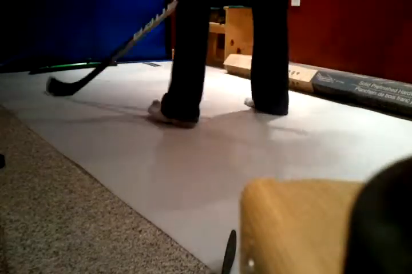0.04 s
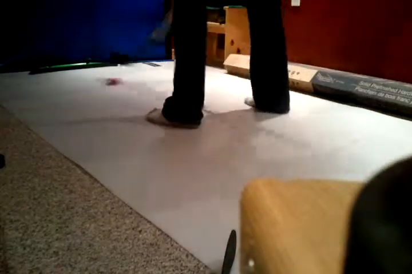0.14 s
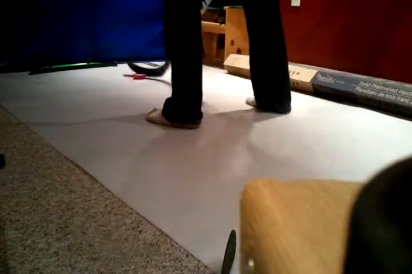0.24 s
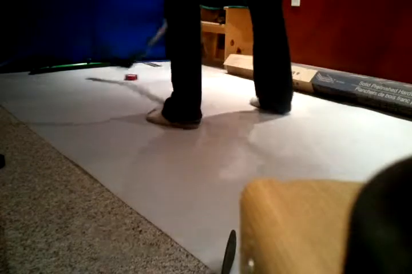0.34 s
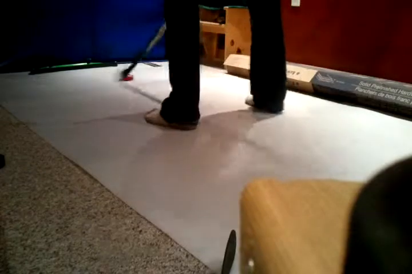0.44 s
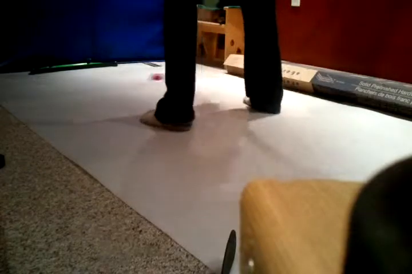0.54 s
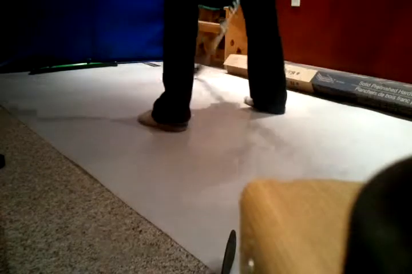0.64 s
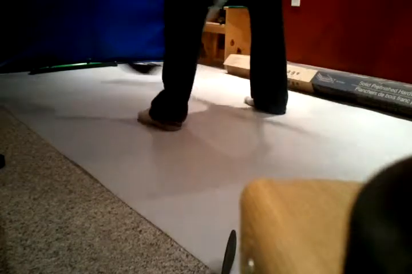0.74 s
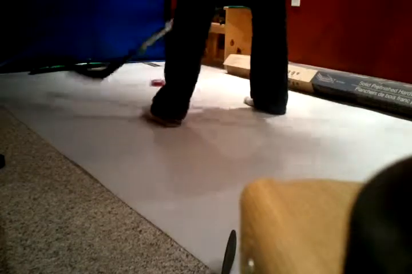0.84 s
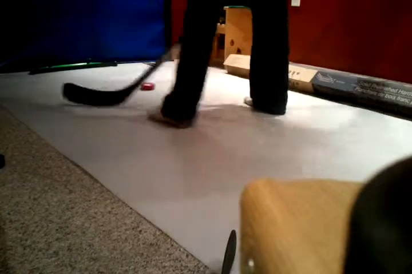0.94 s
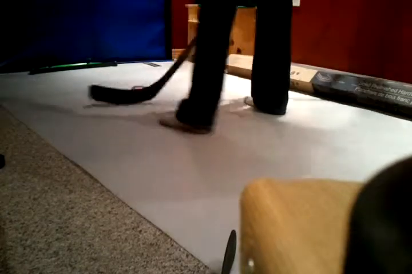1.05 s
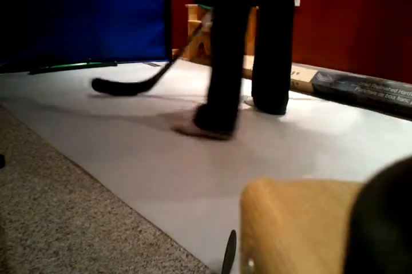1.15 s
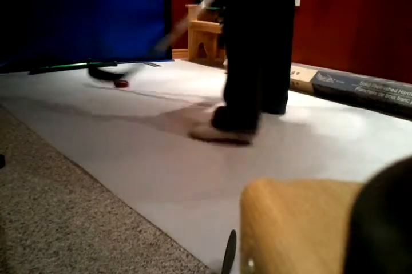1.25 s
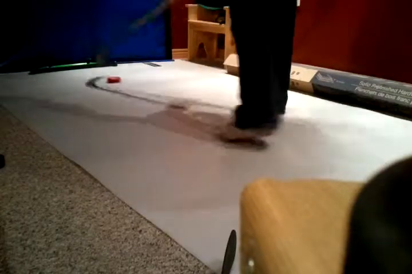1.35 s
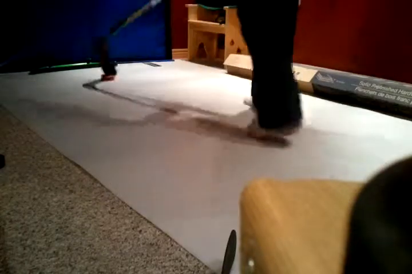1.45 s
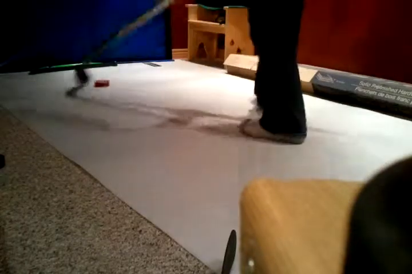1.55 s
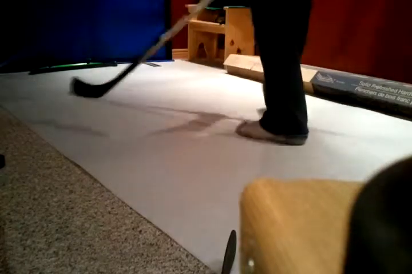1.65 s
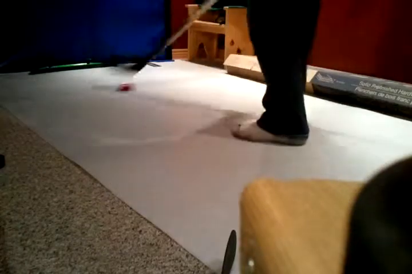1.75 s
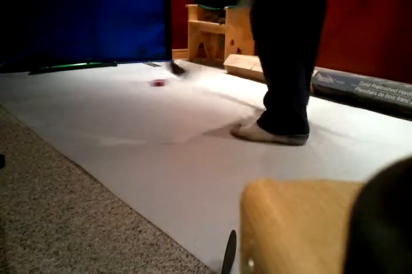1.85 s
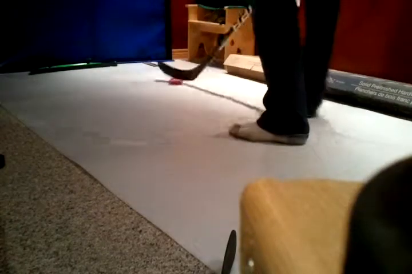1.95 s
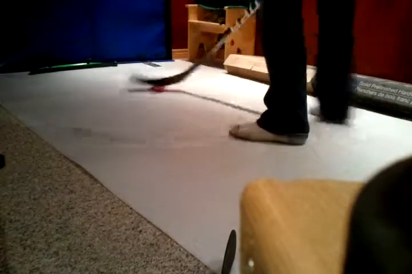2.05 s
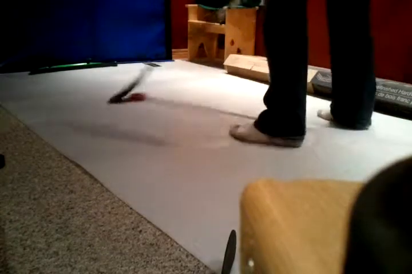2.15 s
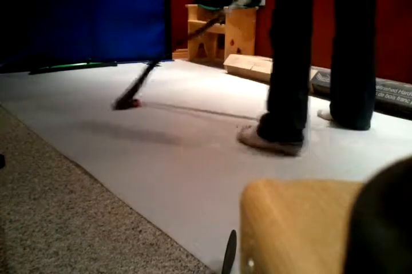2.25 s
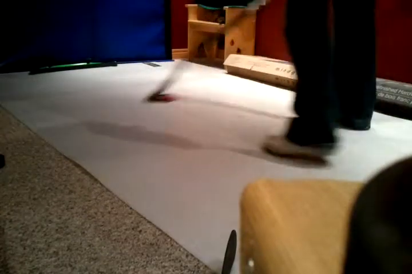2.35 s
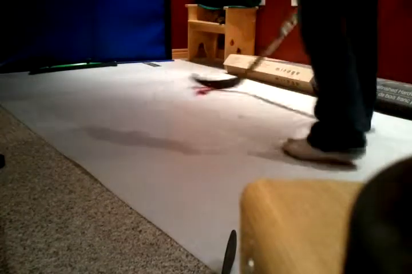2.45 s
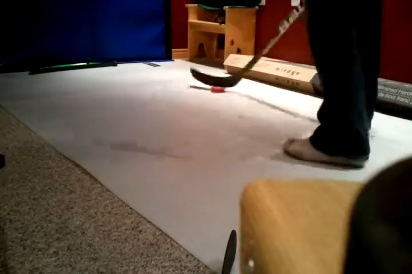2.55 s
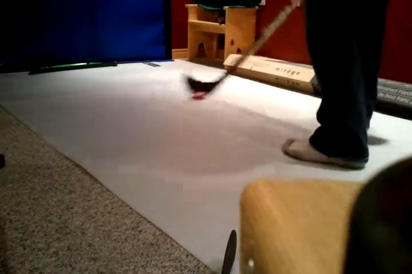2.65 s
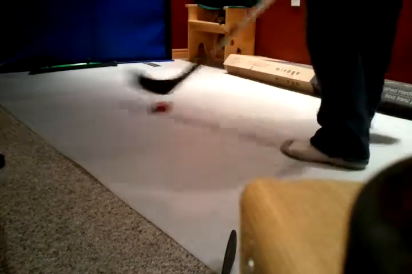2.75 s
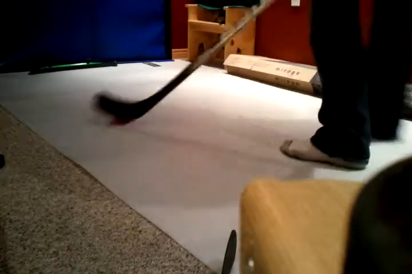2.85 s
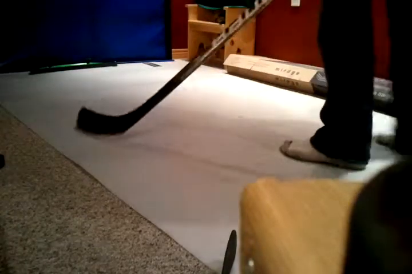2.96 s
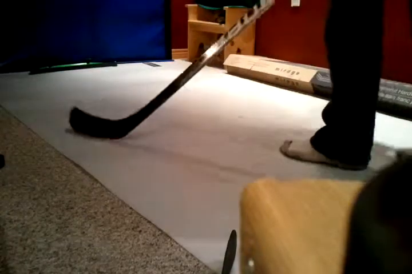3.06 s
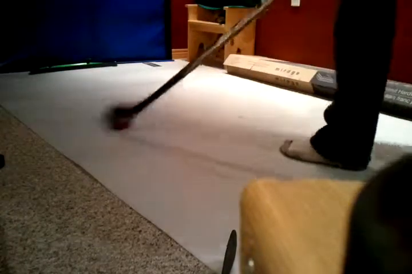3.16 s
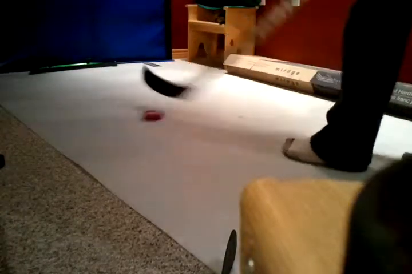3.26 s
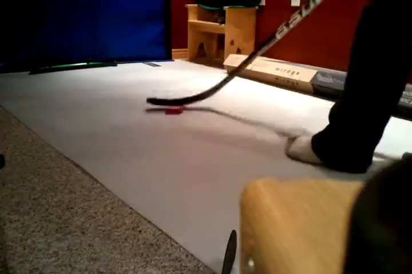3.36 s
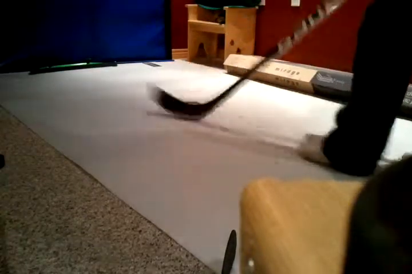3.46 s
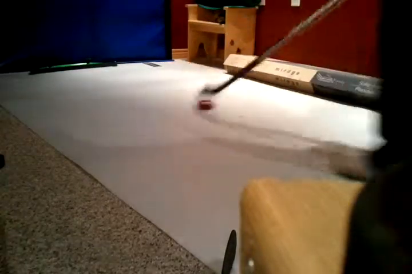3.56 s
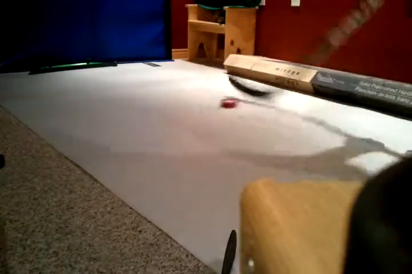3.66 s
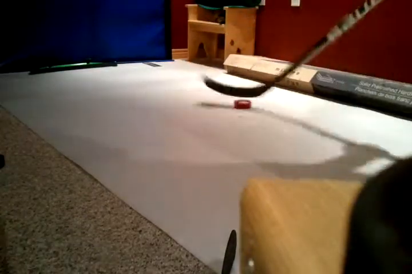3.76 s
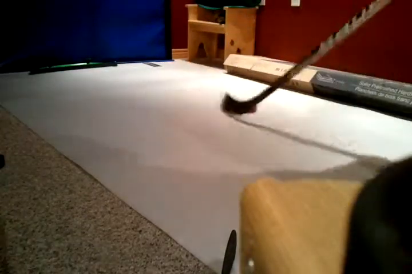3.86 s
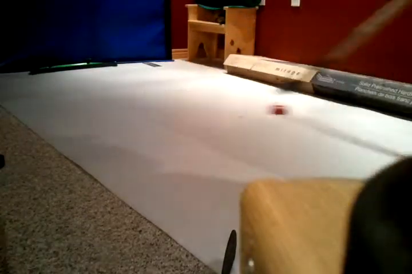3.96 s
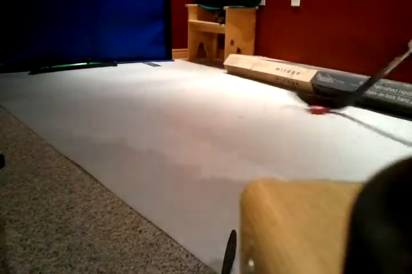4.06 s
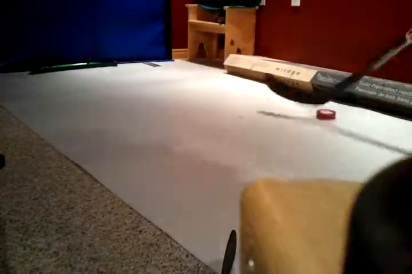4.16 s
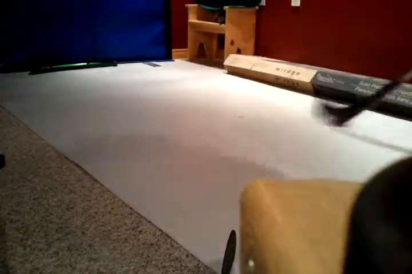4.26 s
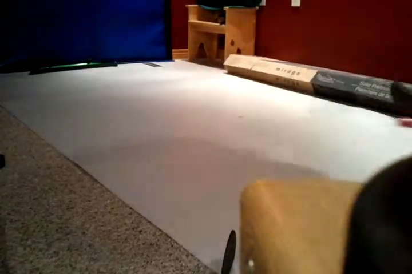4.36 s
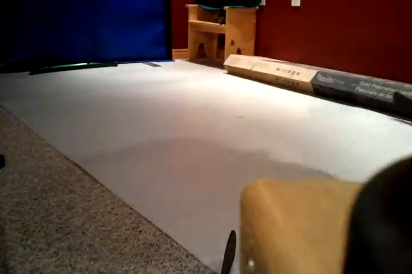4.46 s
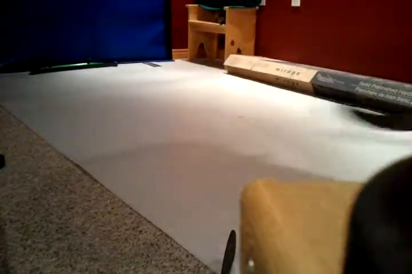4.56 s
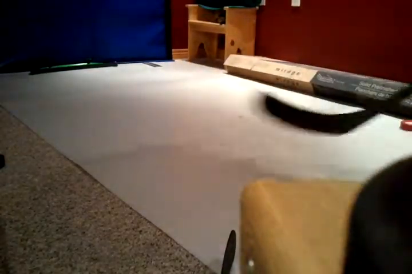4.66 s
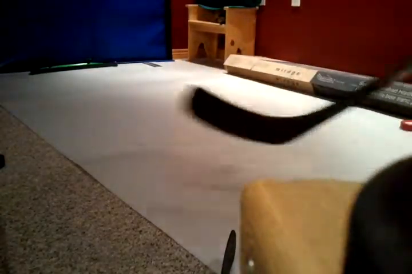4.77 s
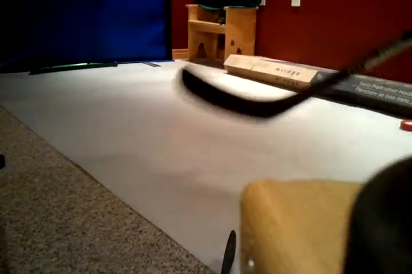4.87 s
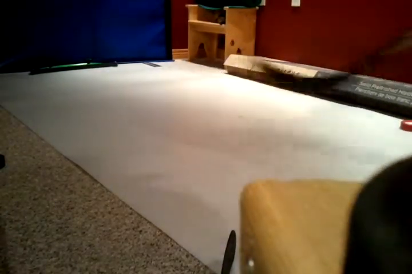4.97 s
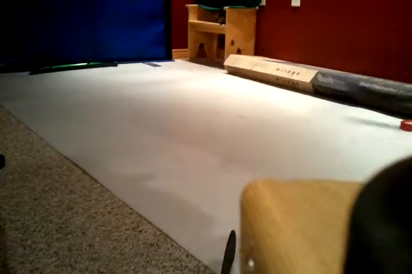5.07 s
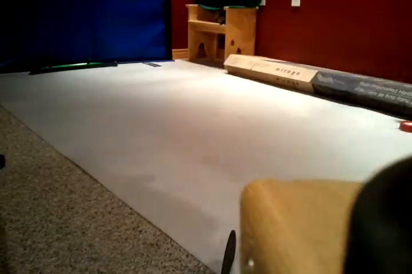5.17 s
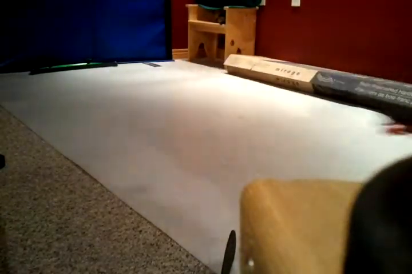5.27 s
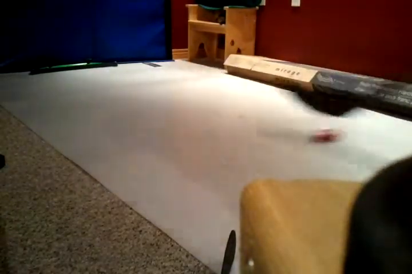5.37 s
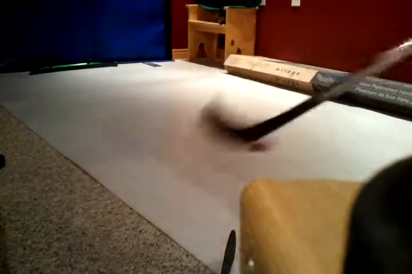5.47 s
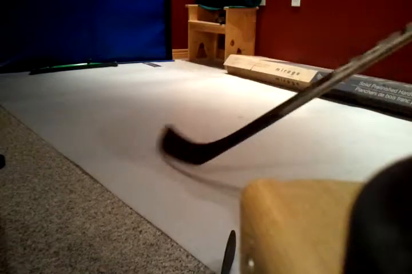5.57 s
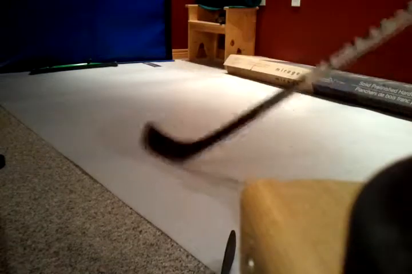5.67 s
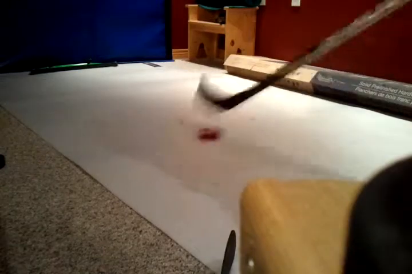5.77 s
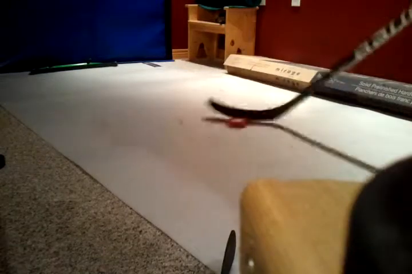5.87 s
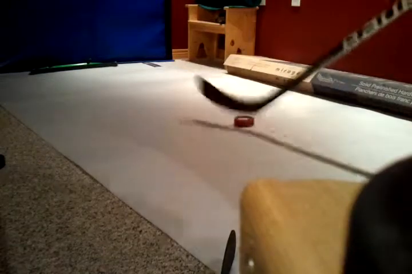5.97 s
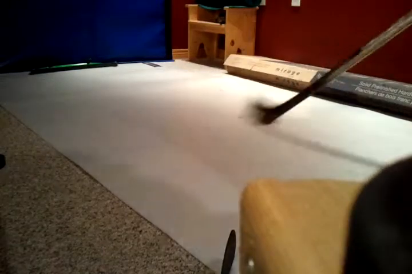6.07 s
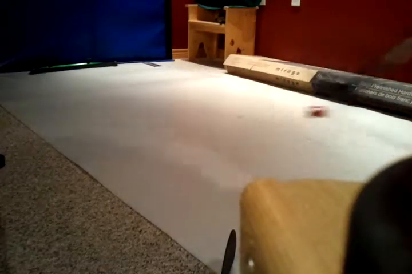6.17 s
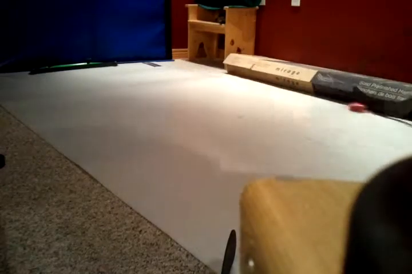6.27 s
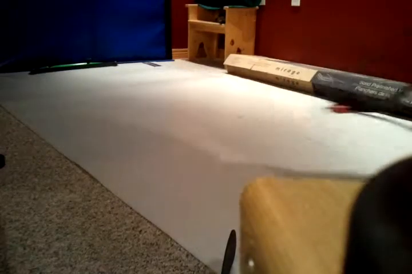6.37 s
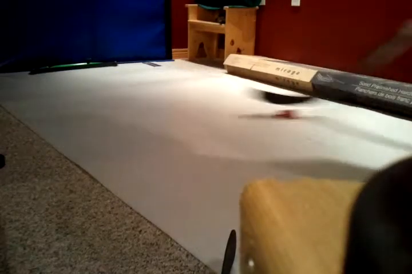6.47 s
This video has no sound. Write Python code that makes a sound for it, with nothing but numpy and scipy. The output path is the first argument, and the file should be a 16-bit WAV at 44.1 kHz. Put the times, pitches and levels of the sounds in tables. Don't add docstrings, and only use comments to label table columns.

```python
import sys
import numpy as np
from scipy import signal
from scipy.fft import rfft, irfft, next_fast_len
from scipy.io import wavfile

SR = 44100
rng = np.random.default_rng(int(sys.argv[2]) if len(sys.argv) > 2 else 0)


def elevation(decibels):
    levels = np.asarray(decibels, float)
    return 10 ** (levels / 20)


def pcm_store(signal):
    levels = np.round(np.clip(np.atleast_2d(signal), -1, 1) * 32767)
    wavfile.write(sys.argv[1], SR, levels.astype(np.int16).T)


N = 287973
HIT_SIZE = 2 ** 14

# frequency in Hz, level in dB, t60 in s.
BLADE_MODES = [(567, -16.5, 0.05), (902, -8.5, 0.018), (1060, -1, 0.013), (1280, -1.5, 0.026),
               (1500, -1.5, 0.014), (1710, -3, 0.024), (1970, -2.5, 0.012), (2156, -3, 0.005),
               (2450, -9, 0.0087)]


def rms_one(x):
    return x / np.sqrt(np.mean(x ** 2) + 1e-20)


def colour(points, size):
    hz, db = np.transpose(points)
    bins = np.arange(size // 2 + 1) * SR / size + 1
    return elevation(np.interp(np.log(bins), np.log(hz), db, left=-70, right=-70))


def causal(gain):
    both_sides = np.r_[gain, gain[-2:0:-1]]
    spectrum = np.exp(np.conj(signal.hilbert(np.log(both_sides))))
    return spectrum[:len(gain)]


def drift(rate):
    knots = rng.standard_normal(400)
    return np.interp(np.arange(N) / SR * rate, np.arange(400), knots)


def steady(points, level_db, patchy_db, rate):
    size = 2 * next_fast_len(N // 2 + 1)
    white = rfft(rng.standard_normal(size))
    noise = irfft(white * colour(points, size))[:N]
    return elevation(level_db + patchy_db * drift(rate)) * rms_one(noise)


def struck(modes, spread_db):
    t = np.arange(HIT_SIZE) / SR
    luck = rng.standard_normal((len(modes), 2))
    total = 0
    for (hz, db, t60), (stronger, sharper) in zip(modes, luck):
        decay = elevation(db + spread_db * stronger - 60 * t / t60)
        total = total + decay * np.sin(2 * np.pi * hz * (1 + 0.027 * sharper) * t)
    return total


def blows(rows, body_modes, bounce_s, lift_db, wet_db, early, overload):
    # frequency in Hz, level in dB, t60 in s.
    pad_modes = [(194, -1.5, 0.028), (211.3, -7, 0.17), (260.4, -1, 0.053), (324.4, 0.5, 0.038),
                 (423.6, 1, 0.021)]
    # frequency in Hz, level in dB.
    click_spectrum = [(700, -71), (2000, -11.5), (3000, -12), (3600, -10), (4300, -7.5), (4800, -6.5),
                      (5250, -4), (5650, -8), (6100, -13.5), (6900, -18.5), (7900, -11), (8700, -16),
                      (11000, -82.5)]
    # t60 in s, tail level in dB.
    room_decay = [
        (0.33, -24),
        (0.22, -17),
        (0.24, -20.5),
    ]
    out, t = np.zeros(N + HIT_SIZE), np.arange(HIT_SIZE) / SR
    click = irfft(causal(colour(click_spectrum, HIT_SIZE)))
    click = click / np.abs(click).max()
    for s, click_db, thud_db, knock_db, ring_hz, ring_db in rows:
        noise = rng.standard_normal((4, HIT_SIZE))
        direct = 0.14 * noise[3] * np.exp(-t / bounce_s)
        direct[0] = 1
        lumps_db = np.interp(t / 0.0042, np.arange(200), rng.standard_normal(200))
        clumps = elevation(1.85 * np.exp(-t / 0.059) * lumps_db)
        build = (1 - np.exp(-t / 0.003)) * (1 + early * np.exp(-t / 0.011))
        thud = struck(pad_modes, spread_db=3.0)
        thud = thud * (1 - np.exp(-t / 0.00076))
        knock = struck(body_modes + [(ring_hz, ring_db, 0.016)], spread_db=3.5)
        parts = zip((thud, knock, click), (thud_db, knock_db, click_db), lift_db, room_decay, noise)
        hit = 0
        for body, db, lift, (t60, tail_db), fresh in parts:
            tail = elevation(tail_db + wet_db - 60 * t / t60) * fresh * clumps * build
            true_db = db + lift + overload * max(db + 12, 0)
            hit = hit + elevation(true_db) * rfft(body) * rfft(direct + tail)
        patch_hz = np.geomspace(5, SR, num=48)
        patches = [(hz, 2.5 * luck) for hz, luck in zip(patch_hz, noise[3, -48:])]
        at = max(round(s * SR), 0)
        out[at:at + HIT_SIZE] += irfft(hit * causal(colour(patches, HIT_SIZE) + 1e-3))
    bass_cut = signal.butter(4, 183.5, "high", fs=SR, output="sos")
    return signal.sosfilt(bass_cut, out[:N])


def glide_level():
    # time in s, hiss level in dB.
    slide = [(0.0, -42), (0.84, -42), (1.02, -47.5), (2.03, -41.5), (3.58, -46.5), (3.76, -43), (4.15, -45),
             (4.64, -49), (4.82, -49), (5.44, -55), (5.55, -41), (6.53, -45.5)]
    # centre in s, level in dB, half length in s.
    skids = [
        (0.0, -23, 0.056),
        (0.296, -39, .05),
        (0.53, -35, .05),
        (.77, -36, .04),
        (1.478, -34.5, 0.05),
        (2.202, -26.5, 0.043),
        (3.835, -41, .04),
        (4.035, -45, 0.035),
        (4.332, -30, 0.059),
    ]
    # centre in s, level in dB, half length in s.
    scuffs = [
        (2.59, -56, 0.021),
        (3.162, -33.5, 0.0068),
        (3.66, -52.5, 0.023),
        (5.15, -47, 0.024),
        (5.677, -36.5, 0.023),
        (6.478, -41, 0.0053),
    ]
    t = np.arange(N) / SR
    swells = sum(elevation(db) * np.exp(-((t - at) / half) ** 2) for at, db, half in skids + scuffs)
    return 20 * np.log10(elevation(np.interp(t, *np.transpose(slide))) + swells)


def room_rumble(hiss_db):
    # frequency in Hz, level in dB per Hz.
    rumble_spectrum = [(15, -66), (25, -26), (75, -10), (128, -0.5), (477, -11), (648, -10.5), (681, -13.5),
                       (1200, -19.5), (1560, -37), (2640, -120)]
    level_db = -45.5 + 0.21 * (hiss_db - np.median(hiss_db))
    return steady(rumble_spectrum, level_db, patchy_db=1.0, rate=18)


def slide_hiss(hiss_db):
    # frequency in Hz, level in dB per Hz.
    hiss_spectrum = [(600, -11), (900, -8.5), (1700, -8), (2400, -10.5), (3200, -12.5), (4200, -7.5),
                     (4800, -4), (5400, -3.5), (5900, -9), (7000, -15.5), (8100, -10), (8800, -19),
                     (11000, -65)]
    return steady(hiss_spectrum, hiss_db, patchy_db=0.5, rate=9)


def carton_bump():
    # start in s, click in dB, thud in dB, carton in dB, carton ring in Hz.
    bumps = [
        (6.492, -0.5, -26, -12.5, 677),
        (6.505, -30, -33, -11.5, 880),
    ]
    # frequency in Hz, level in dB, t60 in s.
    carton_modes = [(423, -5, 0.033), (502, 0, 0.054), (672, 3, 0.058), (862, -0.5, 0.042),
                    (1020, 1, 0.036), (1150, 2, .03), (1390, 0.5, 0.036)]
    rows = [(*row, 7.5) for row in bumps]
    return blows(rows, carton_modes, bounce_s=0.0024, lift_db=[-11, -8, -2], wet_db=-2.0,
                 early=0.34, overload=0.26)


def light_taps():
    # start in s, click in dB, thud in dB, blade in dB, blade ring in Hz.
    taps = [(1.1873, -7, -12.5, -29, 795), (2.3704, -23, -22.5, -34.5, 759),
            (2.4577, -23, -39, -26.5, 1410), (2.4635, -15, -22, -24.5, 1780),
            (2.8756, -18, -47, -37.5, 1730), (3.1714, -16, -16.5, -34, 1030),
            (3.1814, -11.5, -27, -26.5, 626), (3.2294, -34, -40, -28, 900), (3.2812, -28, -21, -34, 1280),
            (3.6272, -20, -22, -23.5, 520), (3.9407, -8, -32, -36, 1390), (4.8085, -44, -31, -45, 1690),
            (6.2317, -11, -15, -34.5, 1500)]
    rows = [(*row, 7.5) for row in taps]
    return blows(rows, BLADE_MODES, bounce_s=0.0036, lift_db=[-12, -4, -2], wet_db=-7,
                 early=1.0, overload=0)


def pad_slaps():
    # start in s, strength in dB, thud in dB, blade ring in Hz, ring level in dB.
    slaps = [(0.2058, 0, -3, 1430, -11), (0.4642, -4, -8.5, 1620, -13), (0.6474, 0.5, -7.5, 1850, -8),
             (0.854, -2.5, -6.5, 970, -1), (1.6377, -1.5, -9, 1770, -22), (2.1146, -3.5, -10.5, 826, 1.5),
             (2.6897, -7.5, -16.5, 1180, -13), (3.0861, -4.5, -23, 1710, 9.5), (3.5405, -2.5, -9, 480, 5),
             (3.708, -4, -10.5, 1470, -18), (3.9176, -3, -15, 920, 5), (4.0912, -5.5, -6, 1370, -16),
             (4.2761, -5, -7, 923, 0), (4.4638, -0.5, -11.5, 272, -0.5), (4.6388, -2, -15.5, 1470, 17.5),
             (5.411, -3, -15, 950, 1), (5.4171, -14, -24, 343, 9), (6.126, -1.5, -12, 1490, -29)]
    rows = [(s, db, thud, db - 11.5, hz, ring) for s, db, thud, hz, ring in slaps]
    return blows(rows, BLADE_MODES, bounce_s=0.0041, lift_db=[-7, -8, 0.5], wet_db=-4.5,
                 early=0.51, overload=0.17)


def puck_cracks():
    # start in s, strength in dB, thud in dB, blade ring in Hz, ring level in dB.
    cracks = [(0.0004, -6, -11, 1060, -18), (0.245, 0.5, -19, 1500, 1.5), (0.4821, -0.5, -33, 1640, -4),
              (0.6976, 0, -23, 1710, 5.5), (0.8982, -0.5, -18, 1490, -16), (1.3845, 1.5, -57, 1610, 7.5),
              (1.6817, -1, -13, 1940, 4), (1.925, 2, -31, 1420, -4.5), (2.1782, -1.5, -26, 1640, 2),
              (2.7578, -3.5, -11.5, 1760, 1.5), (3.779, -3, -30, 1710, 13), (3.9702, -3, -7.5, 1580, -3.5),
              (4.1459, -0.5, -23, 1800, -4), (4.3101, -2.5, -19, 970, 3), (4.4942, -3, -28, 1280, 5),
              (4.666, 0.5, -35, 460, 3), (5.509, -4.5, -7.5, 1900, 7.5), (5.8666, -2, -8, 1200, 5),
              (6.1602, -2.5, -6.5, 1350, -14), (6.2875, -3, -4.5, 1655, 5), (6.3241, -9.5, -23, 1740, -17)]
    rows = [(s, db, thud, db - 10.5, hz, ring) for s, db, thud, hz, ring in cracks]
    return blows(rows, BLADE_MODES, bounce_s=0.0031, lift_db=[-16, -6, -0.3], wet_db=-2.0,
                 early=1.01, overload=0.81)


def scene():
    hiss_db = glide_level()
    impacts = pad_slaps() + puck_cracks() + light_taps() + carton_bump()
    return (impacts + slide_hiss(hiss_db) + room_rumble(hiss_db))[None]


def roll_off(x):
    return signal.sosfilt(signal.butter(12, 16550, fs=SR, output="sos"), x)


def record(dry):
    overloaded = np.clip(dry, -0.72, 0.72)
    band_limit = signal.cheby2(8, 60, 8960 * 1.097, fs=SR, output="sos")
    narrow = signal.sosfilt(band_limit, overloaded)
    clipped = np.clip(narrow, -0.71, 0.71)
    rounding = signal.bessel(2, 15000, norm="mag", fs=SR, output="sos")
    soft = signal.sosfilt(rounding, clipped)
    treble_cut = signal.cheby2(10, 45, 16700, fs=SR, output="sos")
    mix = signal.sosfilt(treble_cut, soft)
    return roll_off(mix)


dry = scene()
out = record(dry)
pcm_store(out)
```